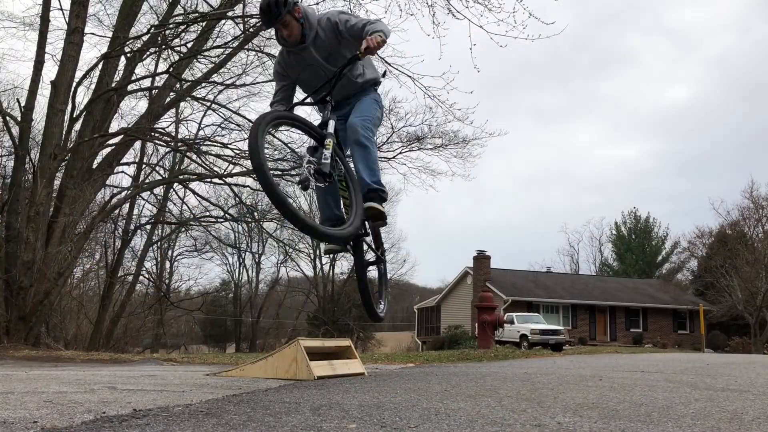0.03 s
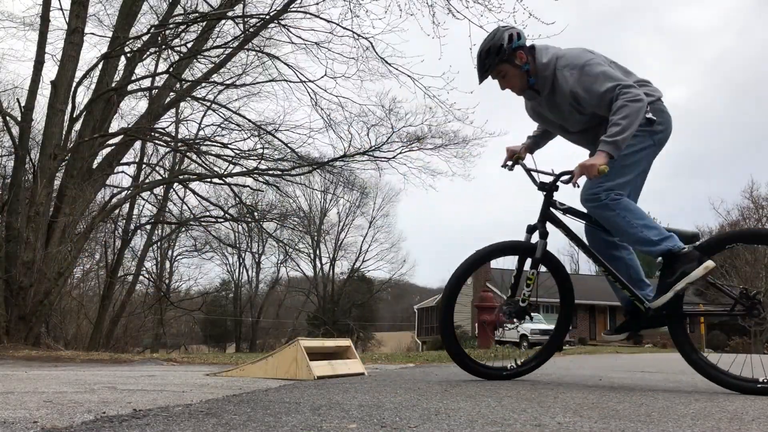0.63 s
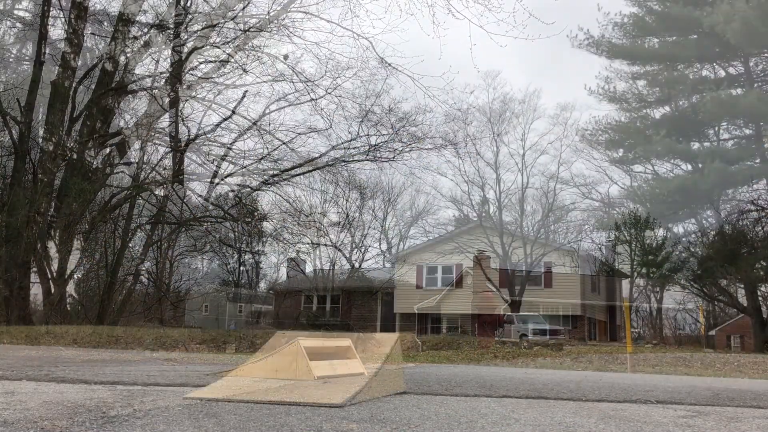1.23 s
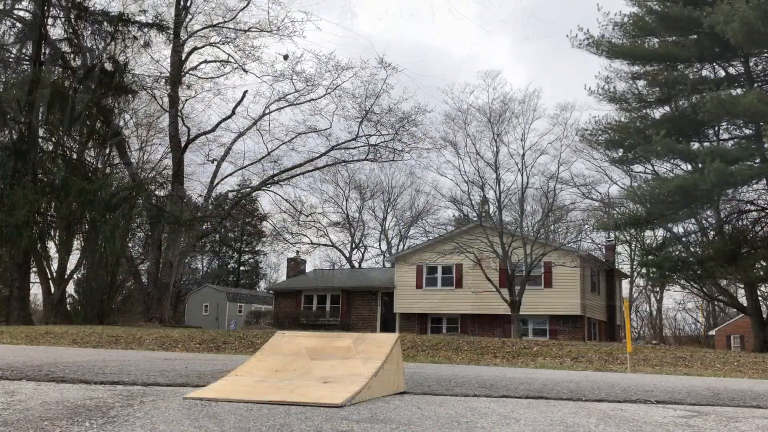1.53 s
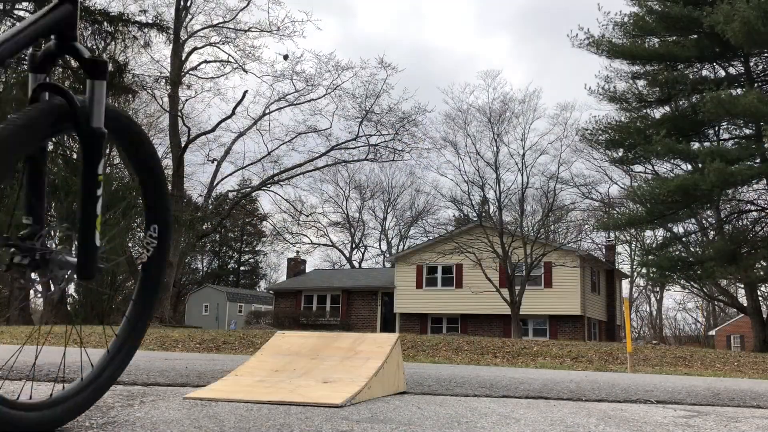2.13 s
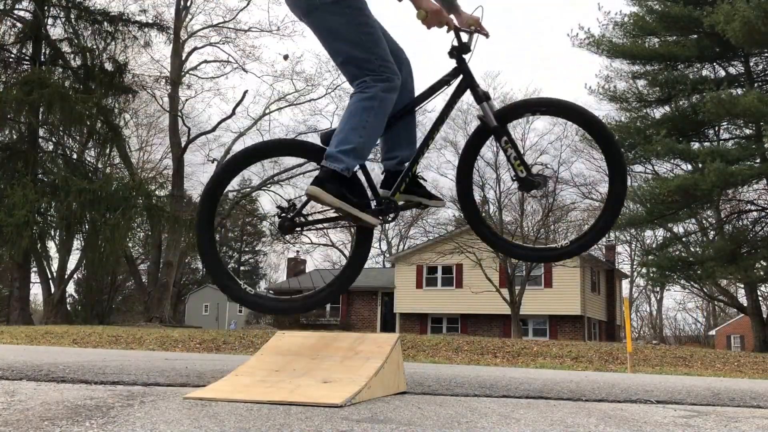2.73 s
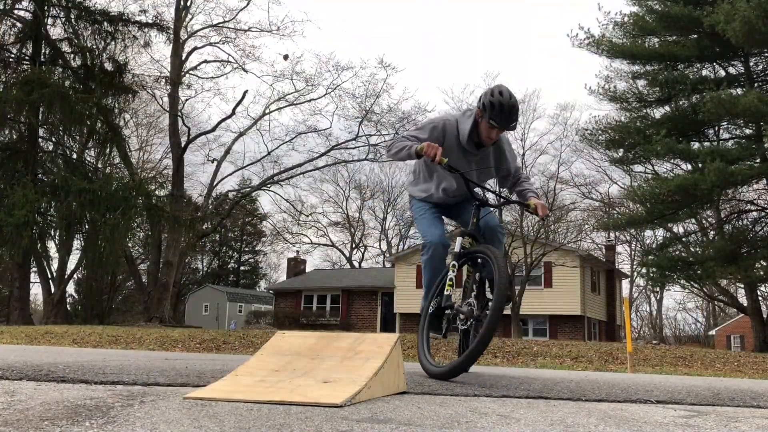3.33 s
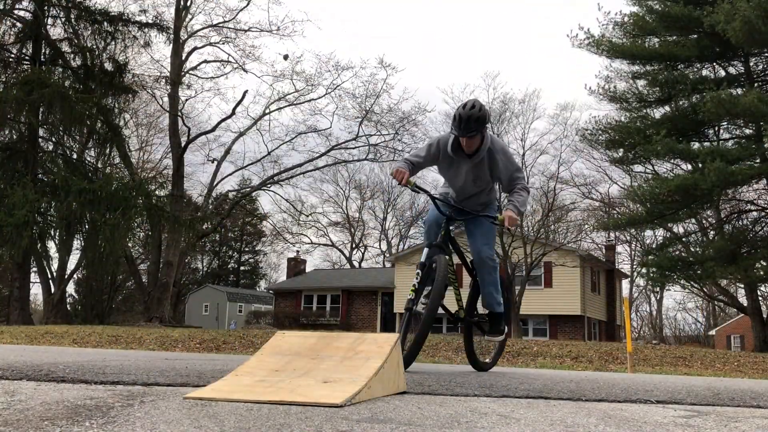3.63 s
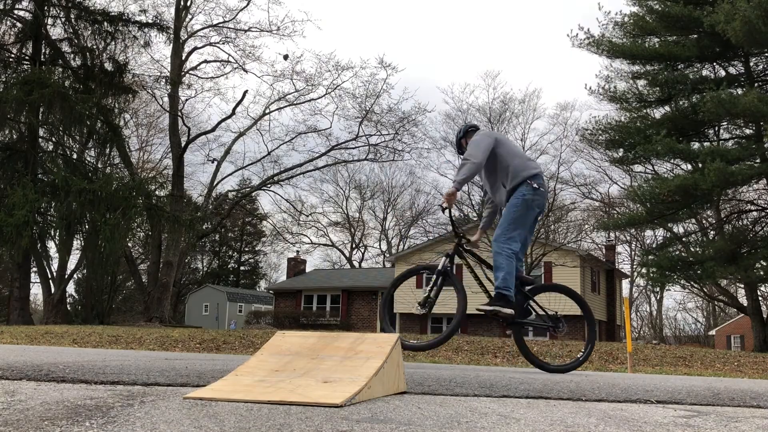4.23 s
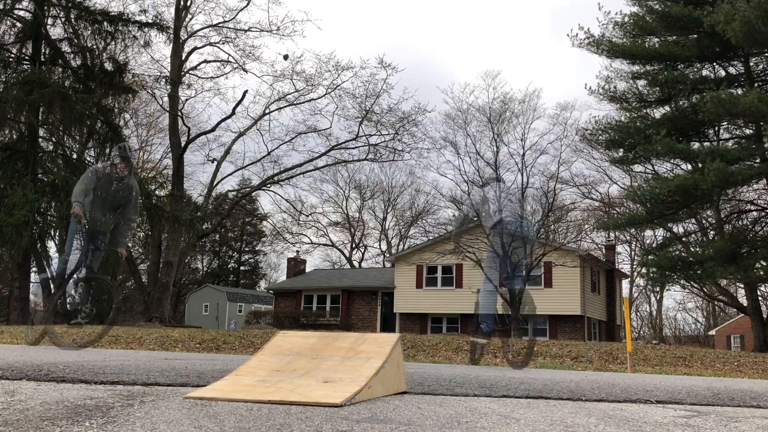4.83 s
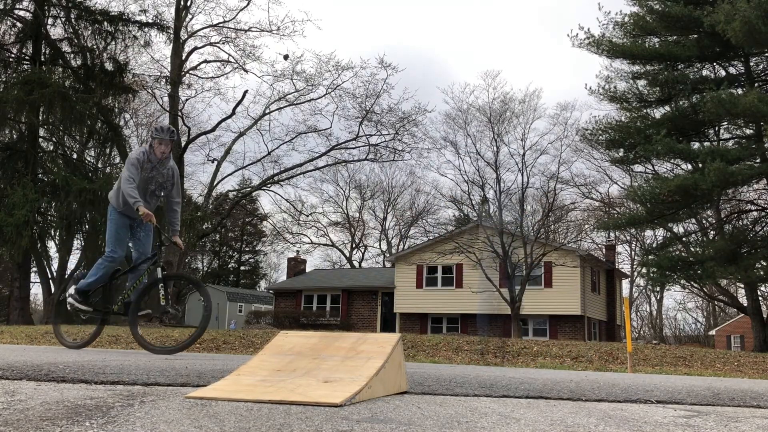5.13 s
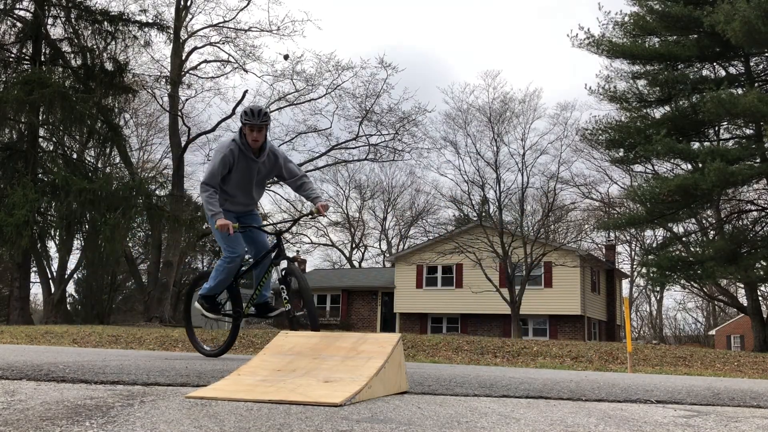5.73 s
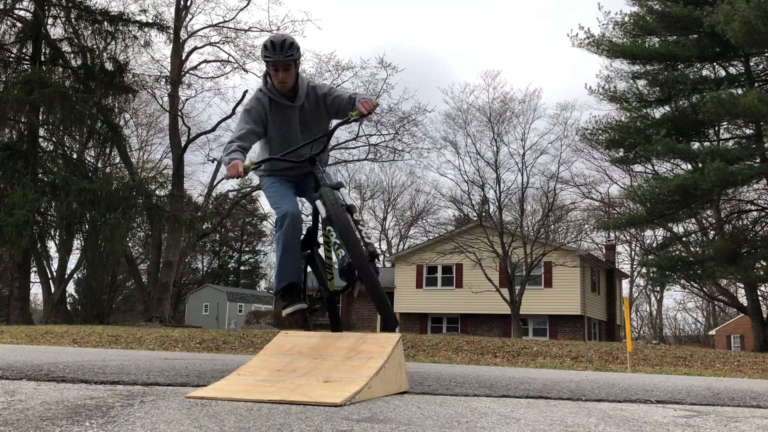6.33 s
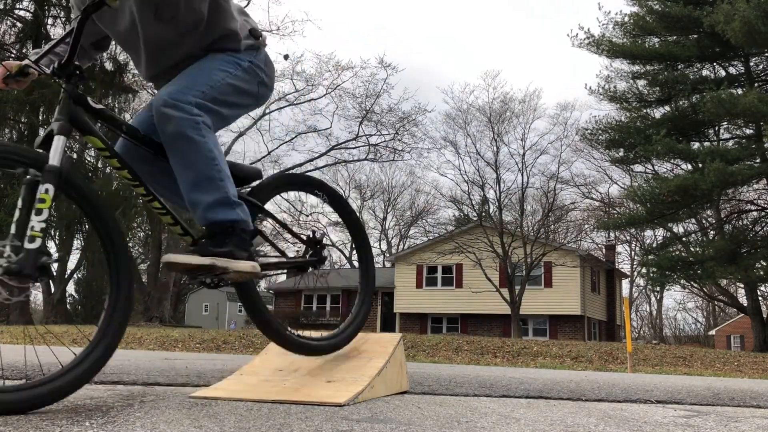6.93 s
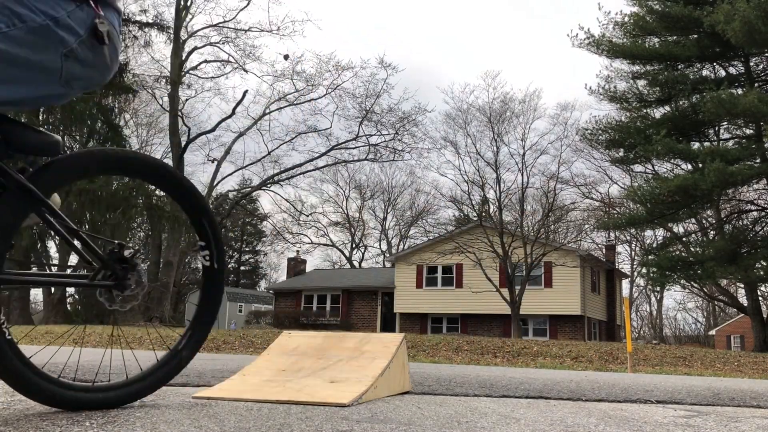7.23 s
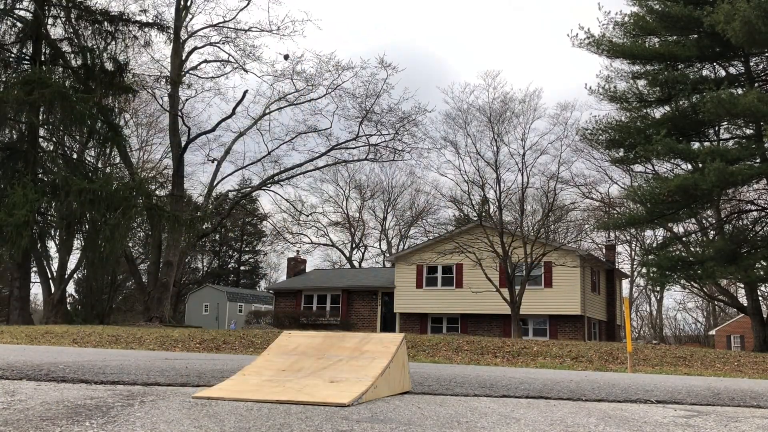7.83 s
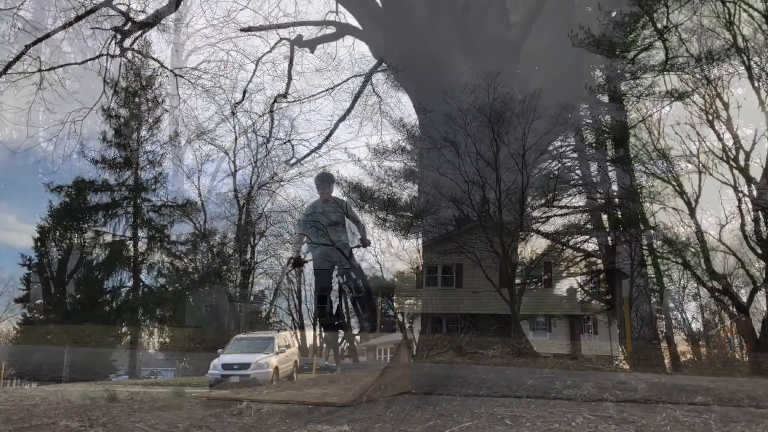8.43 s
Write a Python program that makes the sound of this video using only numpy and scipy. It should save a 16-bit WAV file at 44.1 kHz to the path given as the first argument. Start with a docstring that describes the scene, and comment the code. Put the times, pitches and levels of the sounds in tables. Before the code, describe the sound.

A bicycle lands on asphalt with a thump and a chain rattle, then coasts with its rear hub ticking. It rolls close, knocks over a hollow plywood ramp and lands again with a clack. After more ticking and a few softer bumps, it hits the ramp again with louder booms and clatter, then rolls on and fades. The microphone is close, on a quiet street with faint distant traffic.

```python
"""Dirt-jump bike on a plywood ramp

A bike lands on asphalt and twice rides over a small plywood ramp on a quiet street.
The board booms under the wheels, and the tyres thump, roll and crunch on grit. The chain slaps,
a brake disc sings faintly against its pads, and while the bike coasts, little catches (pawls)
tick over the teeth in its rear hub. Far traffic lies underneath, and it all fades out at the end."""
import sys
import numpy as np
from scipy import signal
from scipy.fft import rfft, irfft
from scipy.io import wavfile
from scipy.ndimage import uniform_filter1d

SR = 44100
rng = np.random.default_rng(int(sys.argv[2]) if len(sys.argv) > 2 else 0)


def materialize(psi):
    """Save the field psi as 16-bit PCM at rate SR to the path in sys.argv[1].

    A 1-D psi becomes a single channel; in a 2-D psi each row is a channel.
    """
    bounded = np.clip(np.atleast_2d(psi).T, -1, 1)
    quanta = np.round(bounded * 32767).astype(np.int16)
    wavfile.write(sys.argv[1], SR, quanta)


N = 382347

# A mode is one tone of a ringing object; t60 is the time it takes to die down by 60 dB.
# tyres hitting the ramp: t/s, slap/dB, boom/dB, favoured f/Hz, boom hold/s, clatter/dB, clatter decay/s
RAMP_HITS = [(2.39, -32.5, -15.5, 541.7, 0.039, -23, .02), (2.401, -32, -4.5, 227, 0.043, -23.5, 0.015),
             (2.601, -50, -20, 287, 0.056, -39.5, 0.029), (6.650, -21.5, -1, 215, 0.038, -15, 0.015),
             (6.671, -50.5, -11.5, 297, 0.037, -27, 0.016), (6.9, -56.5, -13.5, 257, 0.02, -40, 0.033),
             (7.0334, -9, -0.5, 190, 0.13, -11.5, 0.028), (7.06, -13.5, -6, 266, 0.14, -10.5, 0.019),
             (7.192, -35, -16, 230, .06, -42, 0.029)]
# tones of the plywood board: f/Hz, level/dB, t60/s
RAMP_MODES = [(98, -16.5, 0.3), (145.6, -8, 0.35), (182.3, -3.5, 0.17), (219.1, -1, 0.16),
              (236.5, -9.5, 0.15), (284.5, -11, .16), (360, -9.5, 0.18), (450, -2, 0.11),
              (540.2, -7.5, 0.15), (703, -24, 0.11), (883, -18, .11), (1076, -7, 0.1)]
# tone colour of the ramp's clattering joints: f/Hz, level/dB
CLATTER_SPECTRUM = [(60, -12), (200, 2.5), (550, 0.5), (1100, -10), (1600, -12.5), (3000, -19.5),
                    (5500, -26), (8000, -33), (15000, -36)]
# tyres hitting asphalt: t/s, thump/dB, favoured f/Hz, rattle/dB, rattle decay/s, wheel ring/dB
LANDINGS = [(.364, -18.5, 220, -17, 0.02, -46), (.385, -11.5, 201, -19, 0.018, -52),
            (.409, -11.5, 176, -20.5, 0.049, -31.5), (3.124, -19, 378, -18.5, 0.029, -38),
            (3.139, -24, 130, -23.5, 0.034, -48), (4.655, -33.5, 74, -42, 0.028, -68.5),
            (5.168, -43.5, 241, -68, 0.0085, -83), (5.874, -32.5, 130.3, -57, .02, -81),
            (8.007, -37, 261.7, -38.5, 0.0088, -80)]
# tones of the tyre casings and frame: f/Hz, level/dB, t60/s
BIKE_MODES = [(78, -1, 0.2), (103, -6.5, 0.19), (138.8, -4, 0.22), (174, 0.5, .2), (196, -5.5, .25),
              (240, -7.5, 0.34), (325.5, -6, 0.21), (451, -3, 0.18)]
# tones of the spokes and rims: f/Hz, level/dB, t60/s
WHEEL_MODES = [(497, 0, 0.57), (505, 9.5, 1.1), (694, -1, 1.8), (721, -1.5, 1), (970, -7, .7),
               (1066, -5.5, 1.0), (1360, -5, 0.7), (1434, -3, 1.2), (2700, -8, .7), (4580, -7, .8),
               (5290, -12.5, .6)]
# tone colour of loose parts rattling: f/Hz, level/dB
RATTLE_SPECTRUM = [(70, -1.5), (200, 3), (550, 3.5), (1200, -1), (1800, -6), (3200, -12.5), (6000, -15),
                   (9000, -13.5), (15000, -21)]
# a tyre squashed against its rim: middle t/s, level/dB, f/Hz, half length/s
TYRE_BUMPS = [(.43, -20, 175, 0.015), (2.437, -28.5, 105, 0.024), (3.138, -18.5, 120, 0.015),
              (3.1472, -14, 370, .003), (4.676, -31, 85, 0.011)]

# three rides past the listener: start t/s, closest t/s, closest distance/m, speed/(m/s)
RIDES = [(0, 0.548, 1.14, 5), (1.2, 2.251, 0.63, 3.15), (4.85, 7.35, 0.93, 2.3)]
# wheels rolling, as heard from 1 m: start t/s, end t/s, casing/dB, tread/dB, grit/dB
ROLLS = [(.4, 1.3, -51, -58, -63), (1.39, 1.75, -55, -51.5, -59), (1.77, 2.655, -50, -48, -52),
         (3.12, 4.606, -53.5, -49, -60.5), (5.4, 6.42, -49.5, -50.5, -62.5),
         (6.71, 8.67, -44.5, -48, -49.5)]
# the rider's weight pressing the tyres down: t/s, rise/s, decay/s, casing/dB, tread/dB, grit/dB
PRESSES = [(.52, .08, 0.12, -40, -35, -41), (1.84, 0.11, 0.13, -45, -44, -55),
           (2.47, 0.048, 0.098, -34.5, -35, -44), (2.59, 0.061, 0.026, -35.5, -46, -43),
           (3.22, .05, 0.12, -51, -41, -46.5), (4.169, 0.065, 0.051, -54, -40, -46.5),
           (4.67, 0.016, 0.076, -46, -47, -49.5), (4.48, 0.14, 0.12, -65, -54.5, -57),
           (5.56, 0.1, .25, -57.5, -57, -64), (6.29, 0.088, 0.096, -62, -48, -57.5),
           (6.9, 0.15, 0.057, -37, -44, -68.5), (7.2, 0.041, 0.079, -34.5, -62, -40),
           (7.35, 0.043, .08, -55, -43.5, -43.5)]
# tone colour of the rumbling casing (the tyre's body): f/Hz, level/dB
CASING_SPECTRUM = [(50, -26), (120, -3), (190, 3), (250, -10.5), (320, -4), (450, -13.5), (900, -41)]
# tone colour of the rushing tread: f/Hz, level/dB
TREAD_SPECTRUM = [(180, -32), (300, -3), (368, -2.5), (493, -2.5), (553, -8.5), (716, -5), (789, -7),
                  (976, -6), (2500, -19.5), (3250, -37), (5500, -120)]
# tone colour of crackling grit: f/Hz, level/dB
GRIT_SPECTRUM = [(700, -22.5), (1600, -0.5), (3000, -1.5), (5500, -5), (8000, -8.5), (11000, -10.5),
                 (15500, -11.5)]

# coasting clicks: start t/s, end t/s, first rate/Hz, last rate/Hz, first level/dB, last level/dB
COASTS = [(0.029, 0.362, 42, 64, -37.5, -37.5), (0.642, 0.941, 22, 19.4, -42.5, -43),
          (1.083, 1.702, 20.3, 21.5, -49, -55), (1.785, 2.108, 49, 51.4, -48.5, -35),
          (2.121, 2.65, 51.5, 51, -36, -37), (2.667, 3.111, 40.4, 78, -36, -32),
          (3.428, 3.75, 18.2, 20, -43, -33), (3.801, 3.948, 18.6, 30, -40, -37),
          (3.971, 4.249, 47, 64, -33.5, -34), (4.926, 5.34, 39, 52, -44.5, -35.5),
          (5.626, 6.261, 47, 41.4, -37.5, -44.5), (6.383, 6.64, 25, 23.5, -39.5, -42),
          (6.778, 7.44, 33.3, 35.7, -37.5, -37), (7.46, 8.1, 38.3, 40.6, -34.5, -33),
          (8.13, 8.6, 42, 42, -42, -36)]
# tones of the rear hub: f/Hz, level/dB, t60/s
HUB_MODES = [(3326, -5.5, 0.017), (4320, -2, .03), (4540, -3, 0.024), (5380, 1, 0.02), (7770, -3, .025),
             (10580, -0.5, .028), (11000, -2, .028), (13400, -2, .025)]
# tone colour of the pawl clicks: f/Hz, level/dB
PAWL_SPECTRUM = [(1180, -43), (2000, -16.5), (3040, -6), (3310, -2.5), (3770, -4), (4500, -8), (5780, -9),
                 (7770, -7.5), (9490, -7.5), (9830, -2.5), (11000, -2), (13400, -10.5), (15200, -7.5),
                 (16000, -15)]

# chain, fork and rubber chattering on metal: t/s, level/dB, centre f/Hz, width/octaves, length/s
CLACKS = [(0.3638, -12.5, 3880, 0.72, 0.0044), (0.383, -14, 3300, 1.17, 0.0058),
          (0.408, -10.5, 3800, 1, 0.0053), (0.419, -25.5, 6500, 1.6, 0.013),
          (.4395, -24, 10000, 1.4, 0.0034), (0.456, -32.5, 3000, 4.2, 0.029),
          (2.776, -31.5, 700, 1.2, 0.0059), (3.1232, -11.5, 1192, 0.42, 0.0061),
          (3.1236, -17, 3080, 0.63, 0.0063), (3.135, -27, 6220, 0.11, 0.01),
          (3.159, -28, 4500, 0.98, 0.0043), (3.188, -39, 6250, 0.11, .005), (4.467, -43, 8860, .06, 0.0074),
          (4.532, -50, 5940, 1.5, 0.031), (4.667, -35.5, 1900, 2.4, 0.0052),
          (5.398, -41.5, 1235, 0.45, 0.0069), (7.034, -6.5, 5970, 0.14, 0.007),
          (7.069, -19.5, 4860, 0.41, 0.0028), (7.225, -33, 2800, 3.1, 0.0069),
          (7.257, -39, 5460, 0.17, 0.011), (7.295, -46, 1960, 0.12, 0.038)]
# chain links and cables clinking: t/s, level/dB, f/Hz
CLINKS = [(0.086, -38.5, 2400), (0.1087, -32.5, 2480), (.4714, -24, 2570), (0.4798, -24, 2980),
          (.7467, -46, 2390), (.852, -43, 2470), (.9313, -39.5, 2446), (1.1775, -44.5, 2660),
          (1.1964, -50, 2730), (3.3253, -38.5, 2900), (3.3907, -32, 2640), (3.476, -42, 3080),
          (3.5148, -38, 2982), (4.7295, -36.5, 2860), (5.4022, -36.5, 2130), (6.4441, -41, 3200),
          (6.8952, -30.5, 3150), (7.227, -24, 2230), (7.3208, -30, 1940), (7.344, -27.5, 3280)]
# tones of one clink: f/(clink's pitch), level/dB, t60/s
CLINK_MODES = [(1, 0, .016), (.99, -3, .015), (.75, -3, .015), (4.2, -16, .04)]
# the slack chain after a jolt, or a tyre scrubbing: t/s, level/dB, centre f/Hz, decay/s
DRY_RATTLES = [(.46, -37, 2380, 0.12), (3.2, -44.5, 2540, 0.14), (4.11, -44.5, 1900, .08),
               (4.69, -56, 2220, .08), (5.42, -56, 1898, 0.38), (7.16, -39.5, 2400, .18)]
# sharp ticks of grit, small knocks and a few loud freewheel clicks: t/s, level/dB, centre f/Hz, t60/s
TICKS = [(0.1524, -29.5, 7740, .025), (0.558, -22, 2800, .021), (.6974, -33, 2010, .025),
         (0.7358, -38, 2950, .029), (0.782, -31, 10200, 0.032), (.8255, -34, 5800, 0.029),
         (.8688, -35, 2300, .027), (1.235, -30, 6000, .008), (1.4086, -38, 3350, 0.029),
         (1.7859, -27.5, 3016, 0.024), (2.12, -29, 6000, .015), (2.238, -27, 6000, .015),
         (2.334, -27, 6000, .015), (2.496, -26, 2710, .025), (2.777, -30.5, 3000, .028),
         (4.129, -27.5, 3040, .018), (4.1771, -22.5, 2566, 0.019), (4.3832, -34, 4030, 0.028),
         (4.4305, -30.5, 5000, .012), (4.4672, -34, 8780, .015), (4.5109, -19.5, 3600, 0.019),
         (4.704, -27.5, 12300, 0.025), (4.8684, -36, 9000, 0.021), (5.3967, -31.5, 2130, 0.027),
         (6.179, -35, 3350, .02), (6.777, -29, 1831, .045), (6.8758, -35.5, 3100, .025),
         (7.098, -20.5, 1828, 0.027), (7.227, -19, 3300, .025), (7.369, -14, 3593, 0.01),
         (7.6367, -27, 1890, .025), (8.0971, -16, 3900, .034)]
# the brake disc brushing its pads: t/s, level/dB, length/s, favoured f/Hz
DISC_RUBS = [(0.465, -24, 0.031, 14900), (0.528, -39, 0.061, 15850), (0.56, -40, 0.04, 12550),
             (.575, -43, .04, 4830), (0.68, -48, 0.033, 12230), (4.702, -48, 0.036, 12700),
             (6.777, -41, 0.038, 12700), (6.866, -44.5, 0.068, 12200), (6.954, -42, 0.043, 12240),
             (7.134, -43, 0.042, 5360), (7.169, -35, 0.095, 14860), (7.257, -26, 0.04, 12300),
             (7.33, -46, 0.076, 13500), (7.474, -47, 0.041, 12190)]
# tones of the brake disc: f/Hz, level/dB
DISC_MODES = [(4810, -6.5), (5360, -11), (10869, -12.5), (12150, 2), (12560, -5), (12900, -9.5),
              (14720, -9), (15500, -11.5), (15720, -5.5)]
# tyres slipping sideways: middle t/s, level/dB, half length/s
SCUFFS = [(2.584, -41.5, 0.052), (4.225, -53.5, 0.047), (5.28, -59, 0.056), (6.3, -41.5, 0.028)]
# wheels spinning in the air: take-off t/s, touch-down t/s, level/dB
FLIGHTS = [(0.105, 0.383, -57.5), (2.758, 3.16, -54)]

# tone colour of far traffic: f/Hz, level/dB
TRAFFIC_SPECTRUM = [(15, -51.5), (25, -21.5), (74, 0), (108, 0), (229, -10.5), (427, -17.5), (607, -20),
                    (734, -20), (1840, -26.5), (2280, -31), (3340, -33), (9570, -45.5), (11300, -41),
                    (14800, -49), (16000, -49)]
# tone colour of the street's echo: f/Hz, level/dB
ECHO_SPECTRUM = [(80, -6), (300, -1), (1400, 1), (4000, -7.5), (14000, -19)]


def ramp():
    """The ramp's lip slaps the road, the board booms until the tyre damps it, and its joints clatter."""
    out, t = np.zeros(N), clock(.5)
    # short bending waves run through a board faster than long ones, so the slap falls in pitch
    start_hz, sweep_s = 6500, .001618
    cycles = start_hz * sweep_s * t / (t + sweep_s)
    slap = np.sin(2 * np.pi * cycles) * np.exp(-t / .0085)
    for s, slap_db, boom_db, hz, hold, clatter_db, decay in RAMP_HITS:
        damping = np.exp(-(t / hold) ** 2) + undb(-9.5)
        boom = ring(RAMP_MODES, t, favour(RAMP_MODES, hz, octaves=.2)) * swell(t, rise=.011) * damping
        clatter = colour(grains(len(t), per_s=4000, spread_db=2) * np.exp(-t / decay), CLATTER_SPECTRUM)
        add(out, s, undb(slap_db) * slap + undb(boom_db) * boom + undb(clatter_db) * clatter)
    return out


def landings():
    """A tyre thumps down, loose parts rattle and the spokes ring on."""
    out, t = np.zeros(N), clock(.99)
    for s, thump_db, hz, rattle_db, decay, ring_db in LANDINGS:
        thump = ring(BIKE_MODES, t, favour(BIKE_MODES, hz, octaves=.77)) * swell(t, rise=.0046)
        rattle = colour(grains(len(t), per_s=3000, spread_db=3.5) * np.exp(-t / decay), RATTLE_SPECTRUM)
        spokes = ring(WHEEL_MODES, t)
        add(out, s, undb(thump_db) * thump + undb(rattle_db) * rattle + undb(ring_db) * spokes)
    return out


def tyre_bumps():
    """The air in a squashed tyre gives one short, low push."""
    out, t = np.zeros(N), clock(.16) - .08
    for s, db, hz, half_length in TYRE_BUMPS:
        push = np.cos(2 * np.pi * hz * t) * np.exp(-(t / half_length) ** 2)
        add(out, s + t[0], undb(db) * push)
    return out


def rolling_tyres():
    """Rough asphalt shakes the casings, the tread rushes and grit crackles under it."""
    casing_gain, tread_gain, grit_gain = tyre_gains()
    casing = colour(rng.standard_normal(N), CASING_SPECTRUM) * casing_gain * undb(2 * wander(25))
    tread = colour(grains(N, per_s=5000, spread_db=4), TREAD_SPECTRUM)
    tread *= tread_gain * undb(1.4 * wander(40))
    sand = grains(N, per_s=5100, spread_db=5)
    pebbles = undb(-7.5) * grains(N, per_s=60, spread_db=3.5)
    grit = colour(sand + pebbles, GRIT_SPECTRUM) * grit_gain * undb(1.3 * wander(60))
    tread_hum = hum(hz=189, db=-49.5) * during(7.35, 8.55, edge=.29)
    return casing + tread + grit + tread_hum


def tyre_gains():
    """Casing, tread and grit grow louder as the bike rolls closer, and swell under each press."""
    t = np.arange(N) / SR
    nearness = bike_distance() ** -.76  # gentler than 1/distance: the tyres spread along the ground
    power = np.zeros((3, N))
    for start, end, *levels_db in ROLLS:
        power += np.outer(undb(levels_db), nearness * during(start, end, edge=.08)) ** 2
    for s, rise, decay, *levels_db in PRESSES:
        load = np.exp(-(np.minimum(t - s, 0) / rise) ** 2 - np.maximum(t - s, 0) / decay)
        power += np.outer(undb(levels_db), load + 1e-9) ** 2
    return np.sqrt(power)


def bike_distance():
    """Metres to the bike, which passes in a straight line on each ride."""
    t, metres = np.arange(N) / SR, np.ones(N)
    for start, closest_s, closest_m, speed in RIDES:
        metres = np.where(t >= start, np.hypot(closest_m, speed * (t - closest_s)), metres)
    return uniform_filter1d(metres, size=SR // 5)


def freewheel():
    """Pawls drop unevenly over the hub's teeth; each click rings the hub a little differently."""
    out, t = np.zeros(N), clock(.03)
    decay = np.exp(-t / .0022) + undb(-13) * np.exp(-t / .0065)
    for s, gain in pawl_drops():
        hub = ring(HUB_MODES, t, weights=undb(5.8 * rng.standard_normal(len(HUB_MODES))))
        click = rng.standard_normal(len(t)) * decay + undb(-2.5) * hub
        uneven_s = s + .0007 * rng.standard_normal()
        uneven_gain = gain * undb(2.4 * rng.standard_normal())
        add(out, uneven_s, uneven_gain * click)
    return undb(-2.5) * colour(out, PAWL_SPECTRUM)


def pawl_drops():
    """Time and gain of each click: rate and strength glide during a coast, and distance weakens it."""
    metres = bike_distance()
    for start, end, first_rate, last_rate, first_db, last_db in COASTS:
        s = start
        while s < min(end, (N - 1) / SR):
            db = np.interp(s, [start, end], [first_db, last_db])
            yield s, undb(db) / metres[int(s * SR)]
            s += 1 / np.interp(s, [start, end], [first_rate, last_rate])


def clacks():
    """Chain, fork and rubber chatter against metal for a moment and stop abruptly."""
    out, t = np.zeros(N), clock(.11)
    for s, db, hz, octaves, length in CLACKS:
        contact = np.exp(-(2 * t / length - 1.1) ** 4) * swell(t, rise=.0006)
        shape = contact + undb(-24) * np.exp(-t / .022) * swell(t, rise=length)
        noise = band(rng.standard_normal(2 * len(t)), hz, octaves, order=2)
        chatter = noise[len(t):] * shape  # use the second half, where the filter has settled
        crack = band(rng.standard_normal(len(t)), hz=1400, octaves=1.7) * shape
        clack = unit(chatter) + undb(-13) * unit(crack)
        add(out, s, undb(db) * np.sqrt(length / t[-1]) * clack)
    return out


def clinks():
    """Chain links and cables touch and ring briefly in a few tones."""
    out, t = np.zeros(N), clock(.08)
    for s, db, hz in CLINKS:
        link = ring([(hz * ratio, mode_db, t60) for ratio, mode_db, t60 in CLINK_MODES], t)
        chatter = rng.standard_normal(len(t)) * np.exp(-t / .0035)
        clink = signal.fftconvolve(link, chatter)[:len(t)]
        add(out, s, undb(db + .5) * clink / np.abs(clink).max())
    return out


def dry_rattles():
    """Quick random contacts that fade: the slack chain after a jolt, or a tyre scrubbing."""
    out, t = np.zeros(N), clock(.8)
    for s, db, hz, decay in DRY_RATTLES:
        contacts = np.abs(grains(len(t), per_s=170, spread_db=2))
        bursts = signal.fftconvolve(contacts, np.exp(-t / .0018))[:len(t)]
        rattle = band(bursts * rng.standard_normal(len(t)), hz, octaves=.86, order=2)
        add(out, s, undb(db) * unit(rattle) * np.exp(-t / decay))
    return out


def ticks():
    """Grit, a small knock or a loud freewheel click: a sharp snap, then the struck part rings briefly."""
    out, t = np.zeros(N), clock(.1)
    for s, db, hz, t60 in TICKS:
        snap = band(rng.standard_normal(len(t)) * np.exp(-t / .0011), hz, octaves=2, order=2)
        tail = band(rng.standard_normal(len(t)) * die_away(t, t60), hz, octaves=.8, order=2)
        tick = unit(snap) + undb(-.5) * unit(tail)
        add(out, s, undb(db) * tick / np.abs(tick).max())
    return out


def brake_disc():
    """Light rubs on the pads set the brake disc's high tones singing."""
    out, t = np.zeros(N), clock(.3)
    for s, db, length, favoured_hz in DISC_RUBS:
        song = np.zeros(len(t))
        for weight, (hz, mode_db) in zip(favour(DISC_MODES, favoured_hz, octaves=.05), DISC_MODES):
            flutter = 1 + .48 * wander(130, size=len(t))
            song += weight * undb(mode_db) * flutter * tone(hz + 55 * wander(200, size=len(t)))
        shape = swell(t, rise=.0073) * np.exp(-(t / length) ** 2)
        add(out, s, undb(db) * unit(song) * shape)
    return out


def tyre_scuffs():
    """Rubber dragged sideways gives a short, bright hiss."""
    t = np.arange(N) / SR
    drag = sum(undb(db) * np.exp(-((t - s) / half_length) ** 2) for s, db, half_length in SCUFFS)
    hiss = band(grains(N, per_s=7000, spread_db=4.5), hz=5500, octaves=1.9)
    return drag * unit(hiss)


def wheel_whirr():
    """In the air the spinning wheels give a thin, fluttering rush."""
    flying = sum(undb(db) * during(start, end, edge=.12) for start, end, db in FLIGHTS)
    flutter = undb(4.1 * wander(20))
    return flying * flutter * unit(band(rng.standard_normal(N), hz=3600, octaves=1.3))


def street_echo(x, echo_db, t60):
    """The sound plus the faint, dull tail that trees and house fronts scatter back."""
    t = clock(1.2)
    echoes = grains(len(t), per_s=2500, spread_db=1.5) * swell(t, rise=.035) * die_away(t, t60)
    tail = colour(echoes / np.linalg.norm(echoes), ECHO_SPECTRUM)
    return x + undb(echo_db) * signal.fftconvolve(x, tail)[:N]


def far_traffic():
    """Far traffic rumbles and wavers gently; one engine drones through the first half."""
    rumble = colour(rng.standard_normal(N), TRAFFIC_SPECTRUM) * undb(-49 + .8 * wander(.59) + wander(10))
    engine = hum(hz=96.2, db=-52.5) * during(-1, 4.15, edge=.31)
    return rumble + engine


def undb(db):
    """Turn decibels into a gain to multiply by."""
    return 10 ** (np.asarray(db) / 20)


def unit(x):
    """Scale a sound to an average (rms) level of 1."""
    return x / np.sqrt(np.mean(x ** 2) + 1e-18)


def clock(seconds):
    """The time of each sample in one event."""
    return np.arange(int(seconds * SR)) / SR


def add(out, s, sound):
    """Mix a sound in at s seconds."""
    i = max(int(s * SR), 0)
    out[i:i + len(sound)] += sound[:max(N - i, 0)]


def colour(x, spectrum, size=2048):
    """Give a sound the tone colour of a spectrum table; white noise keeps its power."""
    hz, db = np.transpose(spectrum)
    grid_hz = np.arange(size + 1) * SR / (2 * size)
    log_gain = np.log(undb(np.interp(np.log(grid_hz + 1), np.log(hz), db)))
    cepstrum = irfft(log_gain)[:size]  # keeping half makes a filter that rings only after a hit
    response = irfft(np.exp(rfft(2 * cepstrum, 2 * size)))[:size]
    return signal.oaconvolve(x, response / np.linalg.norm(response))[:len(x)]


def band(x, hz, octaves, order=1):
    """Keep the frequencies around hz."""
    edges = np.minimum(hz * 2 ** (np.array([-.5, .5]) * octaves), [.4 * SR, .45 * SR])
    return signal.sosfilt(signal.butter(order, edges, "band", fs=SR, output="sos"), x)


def wander(per_s, size=N):
    """Glide between random values, mostly within -1 to 1."""
    steps = np.arange(size) * per_s / SR
    count = int(steps[-1]) + 2
    return np.interp(steps, np.arange(count), rng.standard_normal(count))


def grains(size, per_s, spread_db):
    """Tiny random impacts of uneven strength."""
    strength = undb(spread_db * np.minimum(rng.exponential(size=size), 4))
    hits = rng.random(size) < per_s / SR
    return unit(hits * rng.choice([-1, 1], size) * strength)


def ring(modes, t, weights=1):
    """The dying tones of a struck object, tuned slightly differently on each hit."""
    hz, db, t60 = np.transpose(modes)
    hz = hz * (1 + .004 * rng.standard_normal(len(hz)))
    gain = undb(db) * weights
    tones = np.sin(2 * np.pi * hz[:, None] * t) * die_away(t, t60[:, None])
    return gain / np.linalg.norm(gain) @ tones


def favour(modes, hz, octaves):
    """Weights for the modes: the spot that is touched brings out those near hz."""
    octaves_away = np.log2(np.transpose(modes)[0] / hz)
    return 1 / (1 + (octaves_away / octaves) ** 2) + undb(-19)


def tone(hz):
    """A sine wave that follows a changing pitch."""
    return np.sin(2 * np.pi * np.cumsum(hz) / SR)


def hum(hz, db):
    """A low tone that wavers in pitch and level."""
    return unit(tone(hz * (1 + .021 * wander(15)))) * undb(db + 3 * wander(17))


def swell(t, rise):
    """Grow softly from 0 to 1."""
    return 1 - np.exp(-(t / rise) ** 2)


def die_away(t, t60):
    """Fall by 60 dB every t60 seconds."""
    return np.exp(-np.log(1000) * t / t60)


def during(start, end, edge):
    """1 between two times and 0 outside, with soft edges."""
    t = np.arange(N) / SR
    return np.clip(np.minimum(t - start, end - t) / edge + .5, 0, 1)


def scene():
    """The bike and the ramp in the open street, as one channel."""
    impacts = ramp() + landings() + tyre_bumps()
    small_sounds = clacks() + clinks() + dry_rattles() + ticks() + brake_disc()
    wheels = rolling_tyres() + wheel_whirr() + tyre_scuffs()
    traffic = far_traffic()
    bike = impacts + small_sounds + wheels + freewheel()
    return (street_echo(bike, echo_db=-28, t60=.9) + traffic)[None]


def record(dry):
    """Drop the deepest bass, clip peaks at full scale, fade out and cut the highest treble."""
    bottom_hz, top_hz, gain_db, fade_span_s = 38, 16000, -1.5, [8.17, 8.624]
    lean = signal.sosfilt(signal.butter(2, bottom_hz, "high", fs=SR, output="sos"), dry)
    fade = np.interp(np.arange(N) / SR, fade_span_s, [1, 0]) ** 1.27
    faded = np.clip(lean, -1, 1) * undb(gain_db) * fade
    return signal.sosfilt(signal.ellip(8, .2, 70, top_hz, fs=SR, output="sos"), faded)


dry = scene()
out = record(dry)
materialize(out)
```